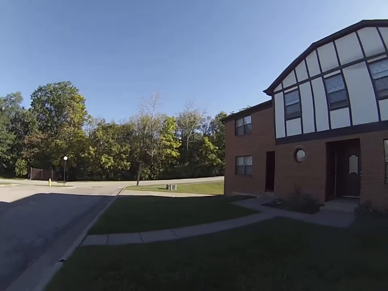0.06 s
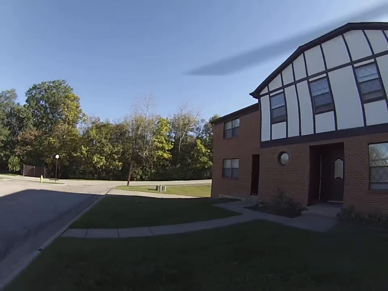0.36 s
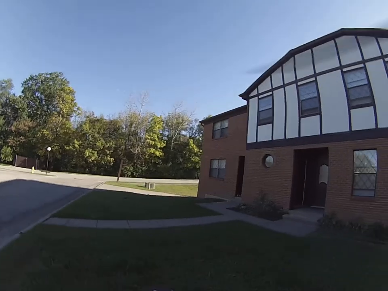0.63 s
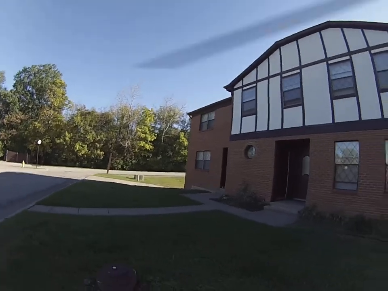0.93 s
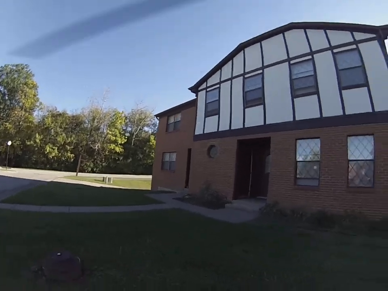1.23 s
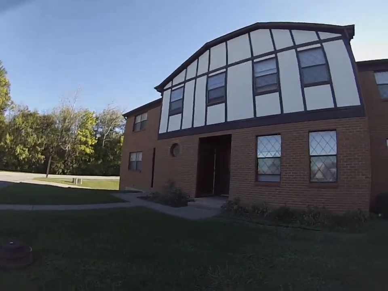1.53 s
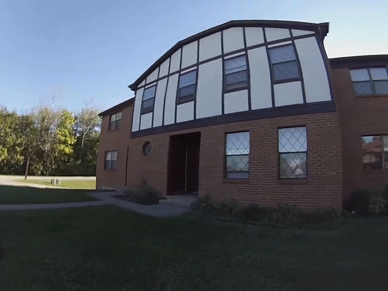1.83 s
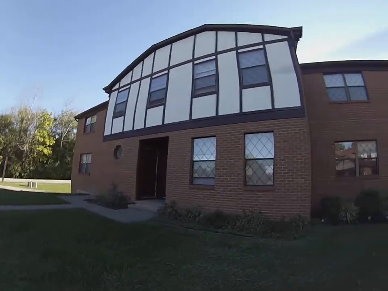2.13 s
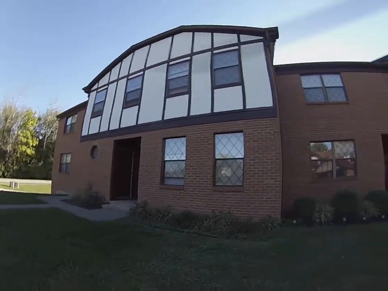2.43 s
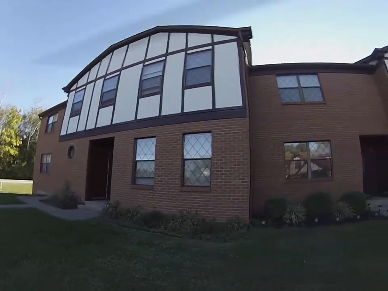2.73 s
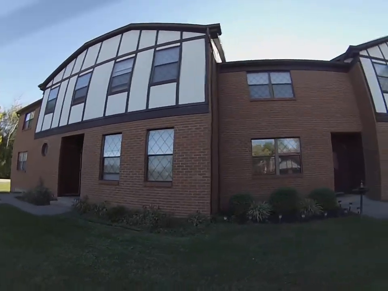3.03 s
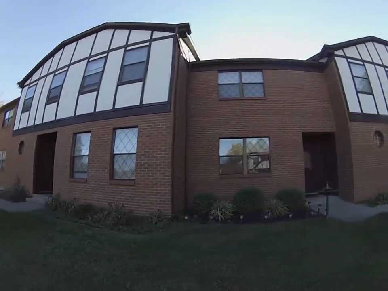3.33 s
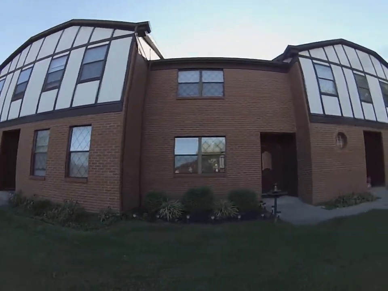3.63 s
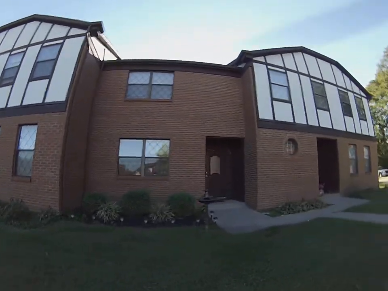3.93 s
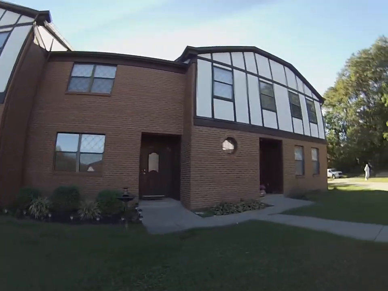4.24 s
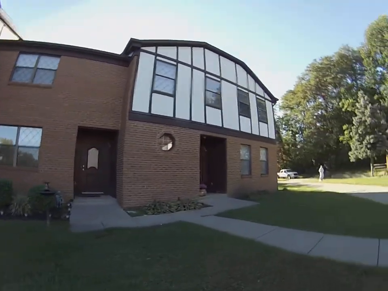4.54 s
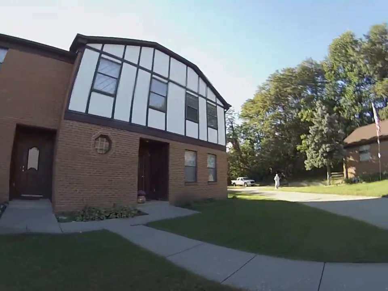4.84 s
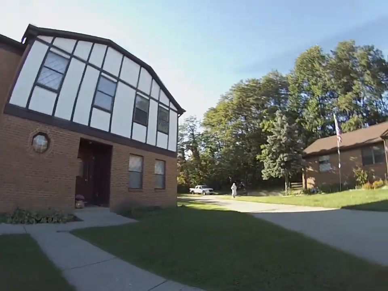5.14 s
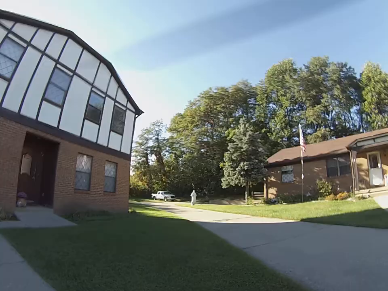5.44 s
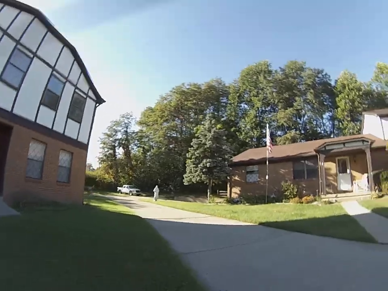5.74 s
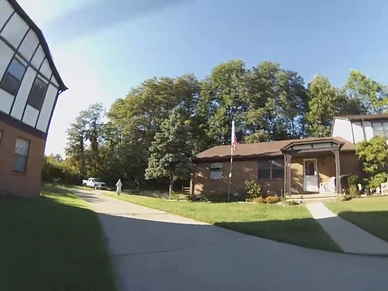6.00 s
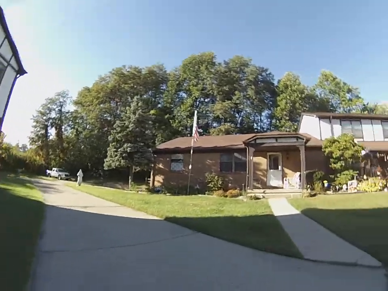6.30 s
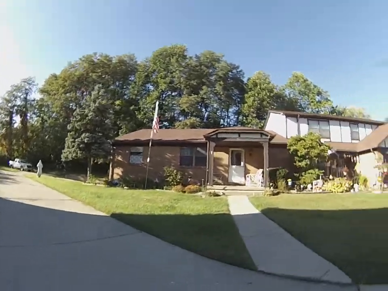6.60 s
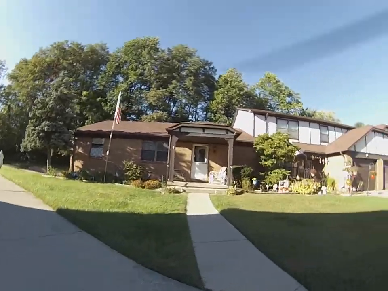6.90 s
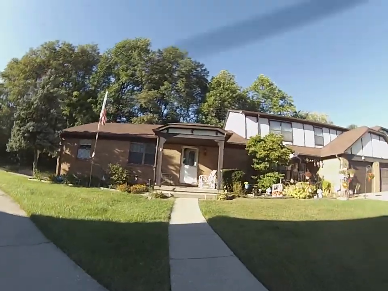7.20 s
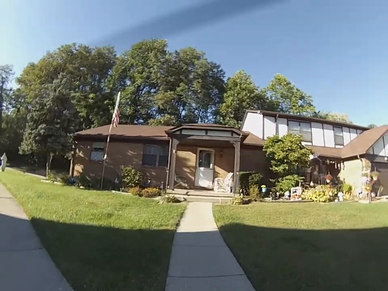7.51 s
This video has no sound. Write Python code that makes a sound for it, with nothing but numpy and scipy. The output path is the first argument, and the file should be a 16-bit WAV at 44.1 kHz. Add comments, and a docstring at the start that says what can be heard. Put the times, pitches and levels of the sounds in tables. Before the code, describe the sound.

A petrol model helicopter buzzes hard and close at a steady pitch, with throbbing blades, rushing air and a few wind gusts.

```python
"""First comes the hard buzz of a petrol model helicopter, right at a camera microphone on its frame.
Cruising past houses, the governed two-stroke fires about 169 times a second into its muffler;
its speed hunts slightly and ripples with the rotor, and the lawn below returns a faint, dull echo.
The main blades throb, the tail rotor and drive train sing, and rotor wash rushes over the microphone.
Each gust first stalls the blade throb, then swells it and buffets the microphone."""
import sys
import numpy as np
from scipy.fft import rfft, irfft, next_fast_len
from scipy.io import wavfile
from scipy.ndimage import map_coordinates

SR = 44100
rng = np.random.default_rng(int(sys.argv[2]) if len(sys.argv) > 2 else 0)


def wav_record(signal):
    """Record a signal, one row per channel, as 16-bit PCM in the file named by sys.argv[1]."""
    frames = np.transpose(np.atleast_2d(signal))
    bounded = np.clip(frames, -1, 1)
    # unit amplitude maps onto the largest positive 16-bit level
    quanta = np.round(bounded * 32767).astype(np.int16)
    wavfile.write(sys.argv[1], SR, quanta)


N = 342216

# engine speed, following the load: (time [s], firing rate [Hz])
ENGINE_SPEED = [(0, 169.68), (0.3, 168.94), (0.8, 168.96), (1.3, 170.28), (1.65, 169.19), (2.6, 169.17),
                (3.05, 169.6), (3.3, 169.19), (4.1, 170.13), (4.7, 169.7), (5.55, 169.96), (6.95, 169.35),
                (7.3, 168.1), (7.76, 168.77)]
# exhaust pulse leaving the muffler, the strong 11th being the mesh of the main gear's pinion: (multiple of the
# firing rate, level [dB])
MUFFLER_HARMONICS = [(1, -17), (2, -22), (3, -25.5), (4, -32), (5, -35.5), (6, -28.5), (7, -32.5), (8, -26),
                     (9, -41.5), (10, -32.5), (11, -21), (12, -24), (13, -31.5), (14, -33.5), (15, -27),
                     (16, -38), (17, -35.5), (18, -53.5), (19, -36.5), (20, -43.5), (21, -39.5),
                     (22, -42.5), (23, -37), (24, -43)]
# metallic buzz above the muffler's range: (multiple of the firing rate, level [dB])
BUZZ_HARMONICS = [(25, -68), (28, -48.5), (31, -66), (37, -54), (41, -56.5), (43, -69), (50, -62),
                  (58, -62.5), (66, -76), (71, -58), (75, -81), (78, -69), (80, -86)]
# gas blast of each firing: (frequency [Hz], relative level [dB])
BLAST_SPECTRUM = [(200, -13), (700, -17), (1300, 4), (2000, 5), (2700, -9.5), (3800, -7.5), (5000, -14),
                  (9000, -40)]
# piston rattle: (frequency [Hz], relative level [dB])
RATTLE_SPECTRUM = [(2000, -23), (3500, 3.5), (4600, 3), (5600, 0.5), (6000, -12), (6400, 2.5), (6850, -1.5),
                   (7500, -2), (12000, -8), (13300, -15), (15000, -20)]
# narrow resonances of the frame under the microphone: (frequency [Hz], width [Hz], gain [dB])
FRAME_RESONANCES = [(6000, 94, 13), (6800, 64, 7), (12030, 140, 0), (13260, 70, 14)]
# slow course of the air at the microphone: (time [s], blade throb [dB], relative buffeting [dB])
AIR_LEVELS = [(0, -24.3, -34.0), (0.7, -28.8, -36.7), (1.4, -24.4, -35.6), (2.2, -27.4, -36.1),
              (3.3, -24.8, -35.5), (4.3, -27.0, -33.1), (5.5, -30.8, -37.5), (6.3, -27.2, -38.6),
              (7.76, -26.5, -35.6)]
# gusts: (time [s], length [s], rise of the buffeting [dB], dip of the throb just before [dB])
WIND_GUSTS = [(.39, 0.3, 6.5, 2), (4.52, .09, 7, 6), (4.82, .14, 10.5, 11), (5.147, 0.13, 7, 9),
              (7.14, .13, 10, 1)]
# main rotor, and tail rotor geared six to one: (multiple of the main rotor speed, level [dB])
ROTOR_TONES = [(1, -37.5), (4, -46), (6, -46), (11, -40.5), (12, -44), (20, -46.5), (24, -46), (60, -41),
               (180, -40)]
# gear and bearing whine: (multiple of the engine speed, level [dB])
WHINE_TONES = [(3.056, -38.5), (5.056, -44.5), (18.8, -44.5), (19.248, -56), (20.352, -55)]
# rotor wash rushing past: (frequency [Hz], relative level [dB])
WASH_SPECTRUM = [(40, -2), (200, 1.5), (300, -1.5), (420, -1.5), (600, 1), (1100, -0.5), (2000, -3.5),
                 (3400, -3.5), (4400, -10), (7500, -16.5), (11500, -18), (13400, -22), (15000, -26)]
# rumble of eddies on the microphone: (frequency [Hz], relative level [dB])
BUFFET_SPECTRUM = [(8, -5), (20, 2.5), (55, 1.5), (100, -4), (180, -6), (300, -17), (800, -41)]

GEAR_RATIO = 100 / 11  # engine turns per turn of the main rotor
BAND_LIMIT_HZ, FULL_SCALE = 15300, 1.0


def amp(db):
    """Decibels to gain."""
    return 10 ** (np.asarray(db) / 20)


def unit(x):
    """x at rms 1."""
    return x / np.sqrt(np.mean(x ** 2) + 1e-20)


def curves(rows):
    """One value per sample for each column after the time."""
    times, *columns = np.transpose(rows)
    return [np.interp(np.arange(N) / SR, times, column) for column in columns]


def wobble(rate):
    """A smooth random curve, rate knots a second."""
    knots = rng.standard_normal(int(N * rate / SR) + 4)
    return map_coordinates(knots, [np.arange(N) * rate / SR], mode="nearest")


def turns(hz):
    """Revolutions made so far at a changing speed."""
    return np.cumsum(hz) / SR


def filtered(x, response):
    """x through a filter whose gain is response(hz)."""
    size = next_fast_len(N + SR // 2)
    return irfft(rfft(x, size) * response(np.fft.rfftfreq(size, 1 / SR)), size)[:N]


def noise(spectrum):
    """Noise of rms 1 coloured by (frequency [Hz], relative level [dB]) points."""
    points_hz, db = np.transpose(spectrum)
    white = rng.standard_normal(N)
    return unit(filtered(white, lambda hz: amp(np.interp(np.log(hz + 1), np.log(points_hz), db))))


def tone(revolutions):
    """A sine of rms 1 that starts anywhere in its cycle."""
    return np.sqrt(2) * np.sin(2 * np.pi * (revolutions + rng.random()))


def burst(crank, at, width):
    """A gate of rms 1 that opens once a revolution; at and width in revolutions."""
    offset = (crank - at + .5) % 1 - .5
    return unit(np.exp(-.5 * (offset / width) ** 2))


def swell(at_s, length_s):
    """A bell in time, 1 at its centre and a half at the ends of its length."""
    return .5 ** ((2 * (np.arange(N) / SR - at_s) / length_s) ** 2)


def crankshaft(hunt_hz=9.5, hunt_depth_hz=0.39, ripple=0.0019, jitter=0.00063, start_turn=.2):
    """Engine revolutions: the governor hunts, the rotor load ripples, no two firings push alike."""
    speed, = curves(ENGINE_SPEED)
    depth_hz = hunt_depth_hz * amp(2.2 * wobble(2.03))
    hunt_cycles = hunt_hz * np.arange(N) / SR + 0.14 * wobble(2)
    hunt = depth_hz * np.sin(2 * np.pi * hunt_cycles)
    load = ripple * np.sin(2 * np.pi * turns(speed) / GEAR_RATIO)
    return start_turn + turns(speed * (1 + load + jitter * wobble(80)) + hunt)


def exhaust_cycle(leak_db=-30, smear_order=9, buzz_scatter_db=0.25, size=2048):
    """One revolution of pressure at the pipe: a sharp pulse, then the muffler's ringing."""
    order = np.arange(size // 2 + 1)
    harmonics = [(0, leak_db), *MUFFLER_HARMONICS, *BUZZ_HARMONICS]
    db = np.interp(order, *np.transpose(harmonics))
    db += buzz_scatter_db * rng.standard_normal(len(order)) * (order > len(MUFFLER_HARMONICS))
    # minimum phase, so the ringing follows the pulse
    cepstrum = irfft(np.log(amp(db)))
    causal = np.r_[1, np.full(size // 2 - 1, 2), np.zeros(size // 2)]
    ringing = np.exp(rfft(cepstrum * causal))
    # highs leave the pipe slightly ahead of lows
    dispersion = (smear_order - 1j * order) / (smear_order + 1j * order)
    in_band = (order > 0) & (order * ENGINE_SPEED[0][1] < BAND_LIMIT_HZ)
    return -irfft(ringing * dispersion * in_band) * size / np.sqrt(2)


def engine(crank, scatter=0.022, blast_db=-31.5, rattle_db=-40.0):
    """Each firing gives its own size of pulse and gas blast; the piston rattles later in the turn."""
    cycle = exhaust_cycle()
    firing = (crank + 0.092).astype(int)  # the count steps just ahead of each pulse
    strength = 1 + scatter * rng.standard_normal(firing[-1] + 1)[firing]
    pulses = np.interp(crank % 1, np.arange(len(cycle)) / len(cycle), cycle, period=1)
    blast_gate = unit(burst(crank, at=0.028, width=0.072) + 0.94 * burst(crank, at=0.3, width=.15))
    blast = noise(BLAST_SPECTRUM) * blast_gate
    rattle = noise(RATTLE_SPECTRUM) * burst(crank, at=0.69, width=0.18)
    return strength * (pulses + amp(blast_db) * blast) + amp(rattle_db) * rattle


def frame(vibration):
    """The frame carries vibration to the microphone, whistling as overtones drift into its resonances."""
    def response(hz):
        return 1 + sum(amp(db) * 1j * hz * width / (centre ** 2 - hz ** 2 + 1j * hz * width)
                       for centre, width, db in FRAME_RESONANCES)
    return filtered(vibration, response)


def ground_echo(source, echo_db=-20, height_m=1.4, bob_m=0.128, dull_hz=2500):
    """The lawn below returns a dull copy; as the height bobs, each overtone slowly swells and fades."""
    path_m = 2 * (height_m + bob_m * wobble(1.2))
    delay_samples = path_m / 343 * SR  # sound travels 343 m/s
    dull = filtered(source, lambda hz: 1 / (1 + 1j * hz / dull_hz))
    return amp(echo_db) * np.interp(np.arange(N) - delay_samples, np.arange(N), dull)


def gusting_air(stall_lead_s=.12, stall_s=.08, throb_follows=0.27):
    """Throb and buffeting levels in dB: each gust first stalls the throb, then lifts both."""
    throb_db, buffet_db = curves(AIR_LEVELS)
    gust_db = sum(rise * swell(at, length) for at, length, rise, _ in WIND_GUSTS)
    stall_db = sum(dip * swell(at - stall_lead_s, stall_s) for at, _, _, dip in WIND_GUSTS)
    return throb_db + throb_follows * gust_db - stall_db, buffet_db + gust_db


def rotors(shaft, throb_db, flutter_db=1.3, waver_db=2):
    """Two main blades throb just overhead; main and tail rotors add wavering tones."""
    tones = sum(amp(db + waver_db * wobble(5)) * tone(order * shaft + 0.086 * wobble(6.7))
                for order, db in ROTOR_TONES)
    throb = amp(throb_db + flutter_db * wobble(13)) * tone(2 * shaft)
    return throb + tones


def drive_train(crank, waver_db=2):
    """Gears and bearings whine close by, in step with the engine."""
    return sum(amp(db + waver_db * wobble(3.8)) * tone(order * crank) for order, db in WHINE_TONES)


def downwash(shaft, buffet_db, wash_db=-24.5, chop=0.058, buffet_trim_db=-0.6, lumps_db=2.5):
    """The rush of air swells at each blade pass; its eddies buffet the microphone."""
    wash = noise(WASH_SPECTRUM) * (1 + chop * np.sin(2 * np.pi * 2 * shaft))
    eddies = amp(buffet_db + lumps_db * wobble(14)) * noise(BUFFET_SPECTRUM)
    return amp(wash_db) * wash + amp(buffet_trim_db) * eddies


def scene():
    """One microphone riding on the frame, at a fixed distance from all that the crankshaft turns."""
    crank = crankshaft()
    shaft = crank / GEAR_RATIO  # main rotor revolutions
    motor = frame(engine(crank))
    echo = ground_echo(motor)
    throb_db, buffet_db = gusting_air()
    mix = motor + echo + rotors(shaft, throb_db) + drive_train(crank) + downwash(shaft, buffet_db)
    return mix[None]


def record(dry, hardness=20):
    """The camera rounds off the tallest pulses near full scale and keeps nothing above its band limit."""
    rounded = dry[0] / (1 + np.abs(dry[0] / FULL_SCALE) ** hardness) ** (1 / hardness)
    return filtered(rounded, lambda hz: hz < BAND_LIMIT_HZ)[None]


dry = scene()
out = record(dry)
wav_record(out)
```